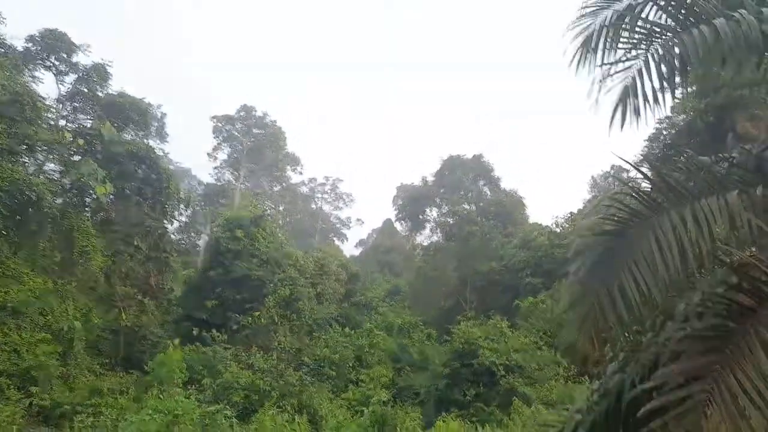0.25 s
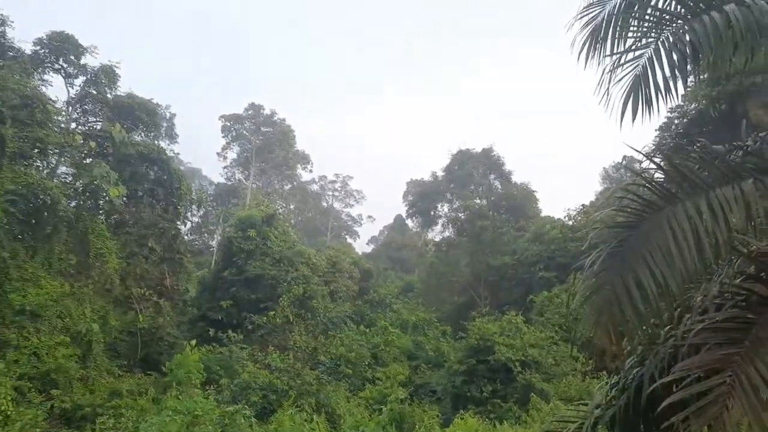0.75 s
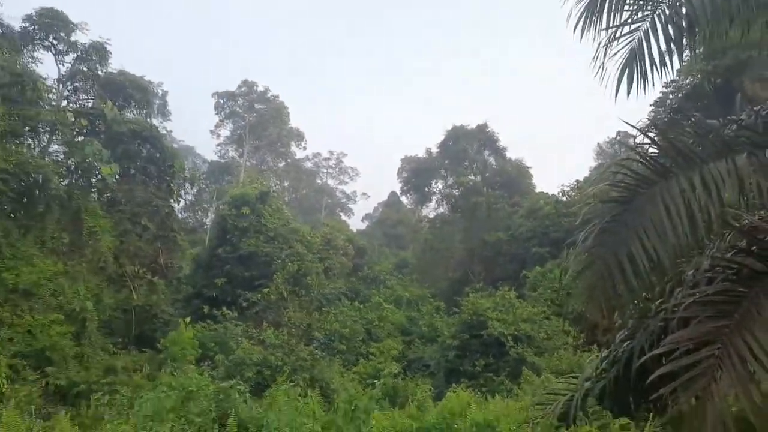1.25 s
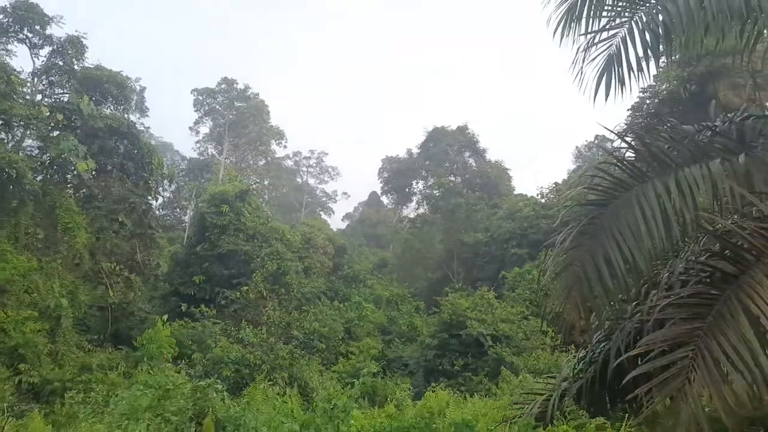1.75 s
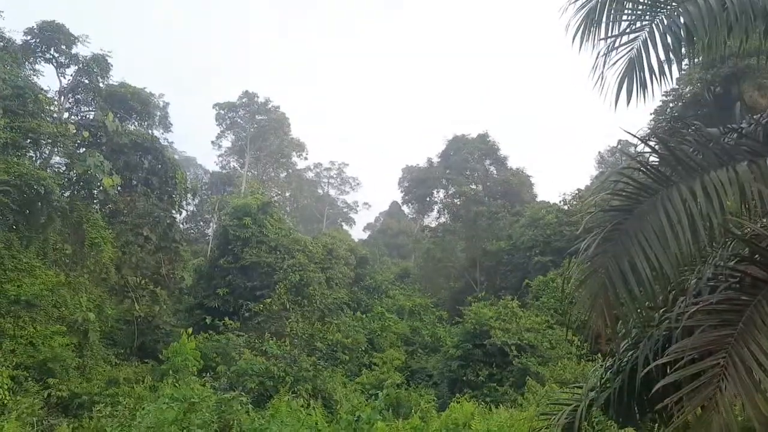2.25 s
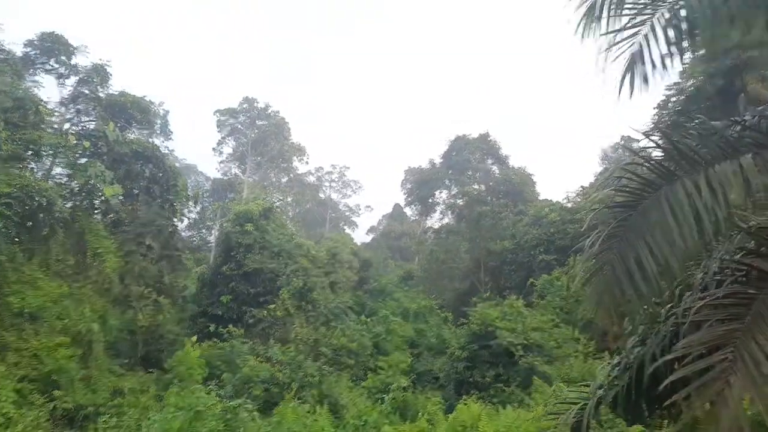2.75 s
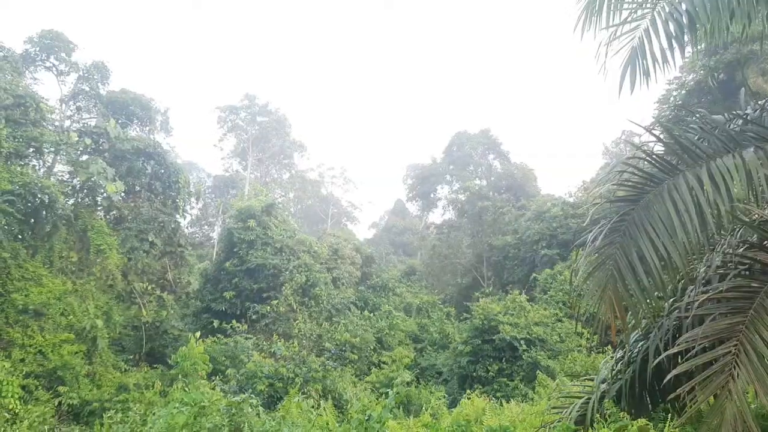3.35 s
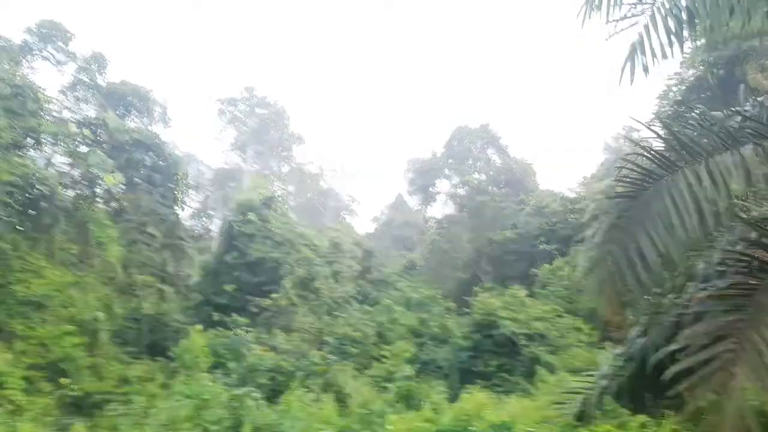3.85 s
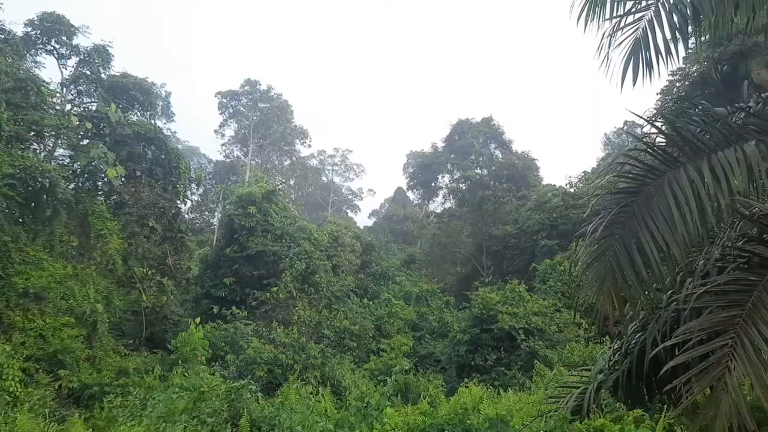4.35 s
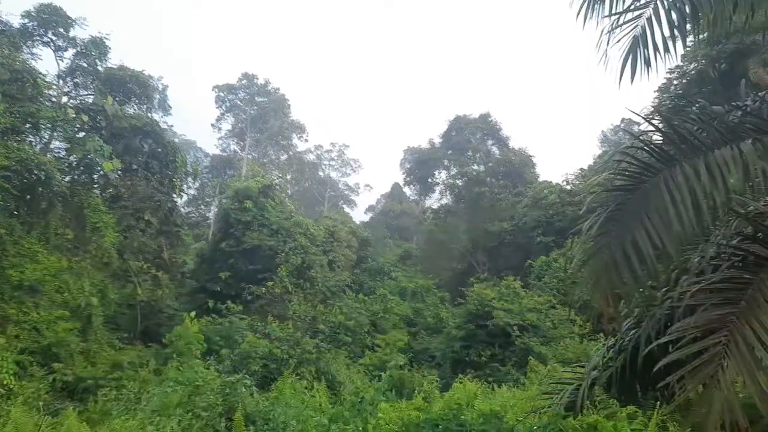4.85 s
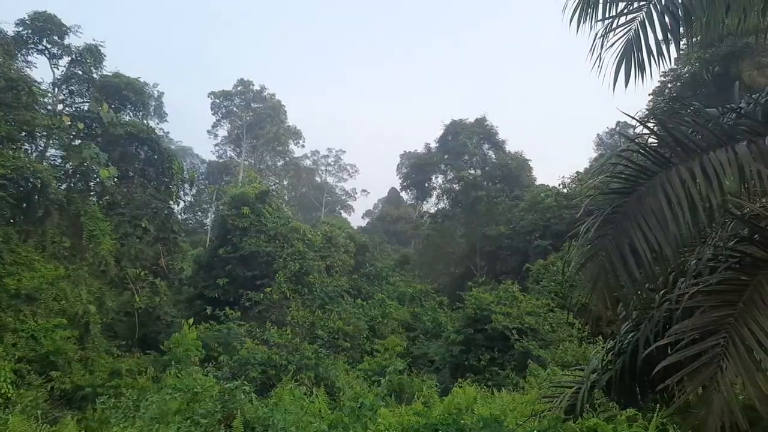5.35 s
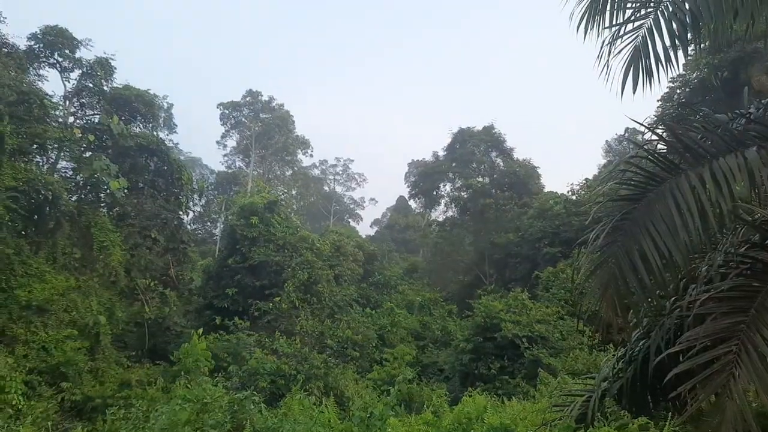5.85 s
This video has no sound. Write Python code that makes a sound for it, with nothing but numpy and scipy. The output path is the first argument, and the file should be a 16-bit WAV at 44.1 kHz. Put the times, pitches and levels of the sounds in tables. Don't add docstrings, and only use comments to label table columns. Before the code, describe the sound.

A near gibbon's whistled note climbs and holds, fingers tap the recorder, then lower gibbon hoots ring out amid cicadas and small birds.

```python
import sys
import numpy as np
from scipy import signal
from scipy.io import wavfile
from scipy.ndimage import uniform_filter1d

SR = 44100
rng = np.random.default_rng(int(sys.argv[2]) if len(sys.argv) > 2 else 0)


def level_to_linear(level):
    exponent = np.asarray(level, float) / 20
    return 10 ** exponent


def unload_audio(sound):
    columns = np.transpose(np.atleast_2d(sound))
    steps = np.round(np.clip(columns, -1, 1) * 32767)
    wavfile.write(sys.argv[1], SR, steps.astype(np.int16))


N = 269010
T = np.arange(N) / SR


def evened(x):
    return x / np.sqrt(np.mean(x ** 2) + 1e-20)


def curves(rows, t=T):
    s, *columns = np.transpose(rows)
    return [np.interp(t, s, column) for column in columns]


def sides(db):
    half = np.atleast_1d(db) / 2
    return level_to_linear(np.array([half, -half])) / np.cosh(db * np.log(10) / 40)


def add(mix, s, sound):
    part = mix[..., round(s * SR):][..., :sound.shape[-1]]
    part += sound[..., :part.shape[-1]]


def tone(turns):
    return np.sqrt(2) * np.sin(2 * np.pi * turns)


def slow(hz):
    lowpass = signal.butter(3, hz, fs=SR, output="sos")
    drift = signal.sosfilt(lowpass, rng.standard_normal(N + SR))[SR:]
    return np.clip(evened(drift), -2, 2)


def resonate(x, hz, width):
    r = np.exp(-np.pi * width / SR)
    pole = [1, -2 * r * np.cos(2 * np.pi * hz / SR), r * r]
    return evened(signal.lfilter([1, 0, -1], np.convolve(pole, pole), x))


# freq_hz, likeness_0_to_1
PORT_LIKENESS = [(25, 0.94), (70, .85), (110, 0.33), (170, 0.25), (300, 0.12), (500, 1), (900, 0.19),
                 (15000, 0.06)]


def noise(spectrum, patchy_db):
    hz = np.fft.rfftfreq(2048, 1 / SR)
    a, b, c, d, patches = rng.standard_normal((N // 512 + 5, 1025, 5)).T
    patches = uniform_filter1d(patches, size=16, axis=0)
    patches = evened(uniform_filter1d(patches, size=8, axis=1))

    def on_log_pitch(rows):
        freq_hz, value = np.transpose(rows)
        return np.interp(np.log(hz + 1), np.log(freq_hz + 1), value)[:, None]

    same = np.clip(on_log_pitch(PORT_LIKENESS), 0, 1)
    left = a + 1j * b
    right = same * left + np.sqrt(1 - same ** 2) * (c + 1j * d)
    z = np.array([left, right]) * level_to_linear(on_log_pitch(spectrum) + patchy_db * patches)
    return evened(signal.istft(z, nperseg=2048, noverlap=1536)[1][:, :N])


# freq_hz, level_db per Hz
AIR_SPECTRUM = [(24, -42), (40, -2.5), (92, -5.5), (189, -20.5), (309, -17.5), (410, -20), (593, -21),
                (1330, -28.5), (1560, -23.5), (1930, -33), (2470, -29.5), (2700, -59), (3510, -99.5),
                (5940, -120)]
# time_s, level_db
BREEZE_LEVEL = [(0, -2), (.6, -3), (1.0, -3.5), (1.8, -6), (2.3, -2.5), (3.2, 2), (3.8, -4.5), (4.9, -5),
                (5.7, -4.5), (6.1, -7)]


def air():
    breeze_db, = curves(BREEZE_LEVEL)
    return level_to_linear(-57 + breeze_db) * noise(AIR_SPECTRUM, patchy_db=3.5)


# time_s, firing_hz, level_db
ENGINE_LINE = [(0, 69.04, -57.5), (.2, 70.24, -51), (.8, 72.64, -53), (1.15, 75.45, -47),
               (1.6, 74.73, -44.5), (1.95, 76.45, -49), (2.15, 80.64, -60), (2.35, 79.36, -76),
               (2.6, 80.23, -50), (3.05, 78.36, -62), (3.45, 80.2, -69), (4.2, 75.05, -61),
               (4.6, 79.9, -50.5), (5.2, 81.8, -55.5), (5.35, 81.4, -90), (5.6, 78.4, -69),
               (5.75, 84.2, -59.5), (6.1, 84.6, -58.5)]
# time_s, lift_db
RUMBLE_GUSTS = [(.2, 12), (3.098, 13.4), (4.63, 4.3), (5.3, 6.7), (6.1, 8.4)]


def engine():
    hz, line_db = curves(ENGINE_LINE)
    bump_s = 0.23
    bumps_db = sum(db * np.exp(-((T - s) / bump_s) ** 2) for s, db in RUMBLE_GUSTS)
    rumble_db = line_db - 8.5 + bumps_db
    line = level_to_linear(line_db + 2.7 * slow(13)) * tone(np.cumsum(hz + 1.2 * slow(6.8)) / SR)
    rumble = level_to_linear(rumble_db + 1.6 * slow(8)) * resonate(rng.standard_normal(N), 116, 60)
    return (line + rumble) * sides(1.0)


def buzz(modes, clicks_hz, sharp):
    turns = np.cumsum(clicks_hz * (1 + 0.033 * slow(8))) / SR
    grit = rng.standard_normal((2, N)) + 0.54 * rng.standard_normal(N)
    puffs = np.exp(-sharp * (turns % 1)) * grit
    return evened(sum(level_to_linear(db) * resonate(puffs, hz, width) for hz, width, db in modes))


# freq_hz, level_db per Hz
CHORUS_SPECTRUM = [(2600, -53.5), (3300, -32), (3900, -30), (4400, -20.5), (4800, -15.5), (5550, -7.5),
                   (6600, -12), (7250, -25.5), (8600, -15.5), (10000, -29.5), (11700, -32.5),
                   (13500, -39.5), (15600, -40)]
# time_s, level_db
CHORUS_LEVEL = [(0, -43.5), (1.5, -43.5), (2, -46), (3.4, -44), (3.75, -46), (5, -45), (6.1, -46)]
# freq_hz, width_hz, level_db
DRONE_MODES = [(5580, 200, -6.5), (6000, 130, -9), (6467, 220, -7)]
# time_s, level_db
AHEAD_LEVEL = [(0, -73), (.75, -83.5), (1.15, -70), (1.95, -76), (3, -71.5), (4, -74), (6.1, -75)]
# time_s, throb_depth_0_to_1
LEFT_DEPTH = [(0, .2), (2.5, .88), (3.6, .88), (4.5, .15), (6.1, .2)]
EARLY_STOP_S = 1.93


def cicadas():
    level_db, = curves(CHORUS_LEVEL)
    chorus = level_to_linear(level_db - 4.5) * noise(CHORUS_SPECTRUM, patchy_db=2.6) * sides(4.3)
    drone = level_to_linear(level_db - 5.5) * buzz(DRONE_MODES, 190, sharp=3.7) * sides(1.3)

    ahead_db, = curves(AHEAD_LEVEL)
    throb = np.clip(.5 + 1.8 * np.cos(2 * np.pi * (6.1 * T - 0.21)), 0, 1)
    ahead_modes = [(5600, 600, 16), (6500, 400, 9), (10500, 900, 2), (11650, 600, 3.5)]
    ahead = throb * level_to_linear(ahead_db + 22) * buzz(ahead_modes, 86, sharp=3)

    depth, = curves(LEFT_DEPTH)
    swell = 1 + np.clip(depth, 0, 1) * np.cos(2 * np.pi * (6.385 * T - .65))
    left_modes = [(8420, 550, 0), (7900, 300, -9), (9200, 500, -9)]
    left = swell * level_to_linear(-59) * buzz(left_modes, 115, sharp=2.4) * sides(14.)
    left = left * (1 - 0.61 * (T < EARLY_STOP_S))

    singing = np.clip((EARLY_STOP_S - T) / .05, 0, 1)
    singing = singing * np.clip(.7 + np.cos(2 * np.pi * (6.6 * T - .2)), 0, 1)
    third = singing * level_to_linear(-61.0) * buzz([(9260, 560, 0)], 190, sharp=0.52) * sides(7.9)
    return chorus + drone + ahead + left + third


# time_into_phrase_s, level_db
CRICKET_PHRASE = [(0, -62), (.2, -63), (.33, -57), (.62, -60.5), (.98, -61), (1.1, -58), (1.27, -61)]
# middle_s, half_length_s
WING_RESTS = [(.75, .16), (2.0, .07), (2.31, .035), (2.9, .012), (3.05, .015), (3.135, .01), (3.33, .02),
              (3.63, .045), (4.29, .015), (4.6, .02), (4.75, .015), (4.85, .015), (5.475, .02), (5.82, .05),
              (5.98, .015)]


def cricket():
    into = (T - .79) % 1.27
    hz = 3136 - 83 * into
    level_db, = curves(CRICKET_PHRASE, into)
    wings = np.clip((T - .11) / 0.044, 0, 1) * (.6 + .4 * (T > .75))
    for s, half in WING_RESTS:
        wings = wings * (1 - .6 * np.exp(-((T - s) / half) ** 4))
    flutter_db = 2 * slow(9) + 1.8 * slow(45) - 1
    return wings * level_to_linear(level_db + flutter_db) * tone(np.cumsum(hz + 4 * slow(30)) / SR) * sides(-3.)


# start_s, level_db, centre_hz, width_hz, length_s
BRUSH_CRACKS = [(.258, -62, 1300, 900, .012), (.675, -61, 3500, 500, .09), (.78, -62, 3400, 700, .05),
                (1.39, -59, 680, 200, .05), (1.53, -60, 1200, 700, .025), (1.77, -64, 1150, 250, .04),
                (2.74, -70, 2100, 500, .04), (3.19, -73, 1600, 1000, .03), (4, -66, 1800, 250, .055),
                (4.25, -63, 900, 400, .035), (4.26, -66, 1500, 700, .04), (4.462, -58, 1250, 900, .025),
                (4.85, -69, 13500, 1500, .08), (5.275, -61, 1350, 500, .045), (5.28, -68, 2200, 400, .04),
                (5.44, -61, 12500, 6000, .09), (5.685, -61, 1000, 500, .04), (5.775, -61, 1100, 600, .025),
                (5.77, -72, 2650, 500, .17), (5.98, -68, 1400, 500, .04)]


def cracks():
    out = np.zeros((2, N))
    for s, db, hz, width, length in BRUSH_CRACKS:
        grains = rng.standard_normal((2, 8000))
        lumps = np.sqrt(rng.exponential(1, 80)).repeat(100)
        grains = (grains * lumps)[:, :round(length * SR)]
        add(out, s, level_to_linear(db) * resonate(grains, hz, width) * signal.windows.tukey(grains.shape[1], .6))
    return out


# crest_s, climb_s, slide_s, climb_db, slide_db
BIRD_SWOOPS = [(0.065, 0.039, 0.063, -99, -50), (0.336, 0.032, 0.075, -44, -60),
               (0.871, 0.0061, 0.057, -99, -47.5), (1.197, 0.036, 0.038, -46, -55),
               (1.787, 0.036, 0.067, -42.5, -45.5), (2.467, 0.049, 0.027, -41.5, -46),
               (4.496, 0.041, 0.046, -52.5, -45.5), (4.854, 0.01, 0.053, -99, -47),
               (5.303, 0.035, 0.025, -41, -45.5), (5.999, 0.036, 0.061, -53, -46.5)]
# start_s, length_s, middle_hz, level_db
CHIP_NOTES = [(1.785, 0.02, 4200, -50), (1.967, 0.011, 3910, -40.5), (3.362, 0.015, 3910, -43.5),
              (3.457, 0.021, 3910, -43.5), (4.235, 0.0091, 3920, -52), (4.325, 0.0083, 3940, -48.5),
              (4.446, 0.0082, 3640, -45.5), (4.462, 0.007, 3110, -45.5), (5.565, 0.0086, 3780, -58),
              (5.686, 0.012, 3940, -47.5), (5.703, 0.015, 3780, -46.5), (5.718, 0.03, 3540, -51.5)]
HOOK_NOTES = [(3.05, 0.092, 2730, -63.5), (3.675, .04, 2071, -72.5), (4.379, 0.017, 3950, -42),
              (4.529, 0.031, 3707, -42.5)]
ARCH_NOTES = [(3.438, 0.014, 4180, -59), (4.34, 0.017, 3830, -49)]
PEEP_NOTES = [(1.427, 0.078, 3820, -51), (2.065, .03, 4170, -47.5), (3.326, 0.017, 4560, -69),
              (3.535, 0.013, 3920, -51.5), (3.972, 0.11, 3890, -55.5), (4.388, .019, 3920, -60.5),
              (5.77, 0.024, 3520, -48.5)]
LEFT_PEEP_NOTES = [(.551, 0.063, 3895, -44), (3.72, 0.052, 2010, -69.5), (4.06, 0.028, 2303, -55),
                   (4.16, 0.022, 2308, -76), (4.292, 0.06, 2015, -65), (5.9, .03, 2020, -73)]
# start_s, length_s, from_hz, to_hz, level_db
GLIDE_CALLS = [(3.009, 0.42, 3890, 3500, -60.5), (2.395, 0.082, 3580, 3780, -59),
               (3.423, 0.084, 2134, 2400, -60), (3.428, .025, 3970, 4320, -44.5),
               (3.69, 0.026, 4300, 4700, -71), (3.737, 0.03, 1990, 1550, -68),
               (4.195, .035, 4530, 4350, -55.5), (0.627, 0.033, 4010, 4330, -48),
               (0.832, .04, 4760, 4870, -47.5), (4.653, 0.15, 5240, 4550, -51.5),
               (5.583, 0.086, 4180, 3845, -45), (5.745, 0.015, 3640, 4360, -43)]
# start_s, length_s, from_hz, to_hz, level_db
FLOCK_CALLS = [(2.094, .012, 4400, 3550, -53), (2.112, .023, 4850, 3250, -46),
               (2.138, .035, 3820, 3200, -52), (2.154, .02, 3600, 4060, -43),
               (2.178, .014, 3750, 3750, -48), (2.218, .018, 3570, 3720, -51),
               (2.24, .012, 3280, 3200, -50), (2.32, .016, 3100, 3300, -52), (3.477, .008, 3480, 3900, -47),
               (3.488, .014, 3950, 3000, -52), (3.52, .012, 3050, 3300, -48),
               (3.555, .016, 3560, 3200, -48), (.7, .02, 3300, 3900, -56), (.735, .02, 4000, 3400, -55),
               (.77, .025, 3700, 3200, -56), (.82, .02, 3300, 3800, -56)]
# start_s, length_s, from_hz, to_hz, level_db
STRAY_CALLS = [(1.72, .06, 2280, 2300, -64), (1.795, .02, 2330, 2350, -62), (1.83, .03, 2320, 2340, -64),
               (1.76, .03, 1950, 2050, -67), (1.933, .028, 4300, 4400, -47), (4.286, .008, 3200, 4300, -56),
               (4.295, .035, 4420, 4400, -55), (5.37, .016, 7500, 7950, -39),
               (5.388, .025, 7950, 7750, -37), (5.415, .028, 7700, 6700, -34.5),
               (4.83, .08, 6950, 6900, -55), (4.83, .06, 13900, 13800, -71), (3.61, .08, 3900, 3930, -61),
               (.873, .028, 2700, 3500, -54), (1.4, .014, 7600, 7400, -57), (2.3, .014, 7800, 7500, -58),
               (3.205, .014, 7850, 7600, -54), (4.16, .025, 7600, 7500, -57)]
# start_s, count
BIRD_TICKS = [
    (2.927, 3),
    (3.045, 1),
    (3.243, 3),
    (3.488, 3),
    (3.764, 3),
]


def birds():
    notes = []  # start_s, length_s, start_hz, middle_hz, end_hz, level_db, pan_db
    for s, count in BIRD_TICKS:
        for k in range(count):
            notes.append((s + k * .035, .017, 5150, 4700, 4300, -48 + k * 2.5, -3.))
    for crest, climb, slide, climb_db, slide_db in BIRD_SWOOPS:
        if climb:
            notes.append((crest - climb, climb, 4350, 4850, 5000, climb_db, 1.5))
        notes.append((crest, slide, 4950, 4220, 3330, slide_db, -1.))
    for s, length, a, b, db in GLIDE_CALLS + FLOCK_CALLS + STRAY_CALLS:
        notes.append((s, length, a, np.sqrt(a * b), b, db, 3.))
    shapes = [  # notes, start / middle pitch, end / middle pitch, pan_db
        (CHIP_NOTES, 1.14, 0.87, -8), (HOOK_NOTES, 0.79, 1.04, -1.5), (ARCH_NOTES, 0.79, 0.74, -8.5),
        (PEEP_NOTES, 1.01, 0.96, -1.), (LEFT_PEEP_NOTES, 0.99, 1.0, 7)]
    for rows, start, end, pan_db in shapes:
        notes += [(s, length, start * hz, hz, end * hz, db, pan_db) for s, length, hz, db in rows]

    out = np.zeros((2, N))
    for s, length, start, middle, end, db, pan_db in notes:
        u = np.linspace(-.1, 1.1, round(1.2 * length * SR))
        hz = start * (2 * u - 1) * (u - 1) + middle * 4 * u * (1 - u) + end * u * (2 * u - 1)
        note = level_to_linear(db) * tone(np.cumsum(hz) / SR) * signal.windows.tukey(len(u), .4)
        add(out, s - .1 * length, note * sides(pan_db))
    return out * level_to_linear(3 * slow(110) - 1.5)


# time_s, level_db
SKIN_LEVEL = [(0, -70), (.5, -67), (1.4, -64.5), (2.05, -75.5), (3.15, -82), (3.8, -83), (4.5, -67),
              (5.2, -76), (6.1, -67.5)]


def hand():
    level_db, = curves(SKIN_LEVEL)
    return level_to_linear(level_db + 3.0 * slow(20)) * resonate(rng.standard_normal(N), 200, 340) * sides(8.)


# start_s, level_db, case_ring_hz, crest_s, tick_db
FINGER_TAPS = [(0.257, -44.5, 393, 0.0033, -76), (0.646, -42, 264, 0.0042, -39),
               (0.757, -39.5, 225, 0.0045, -36), (1.055, -50, 287, 0.0031, -20),
               (1.089, -40.5, 270, 0.0036, -25), (1.2273, -27, 250, 0.0045, -30),
               (1.2277, -34, 650, 0.0012, -30), (1.279, -21.5, 500, 0.0022, -21),
               (1.2996, -19, 510, 0.0018, -40), (1.3001, -28, 1000, .0009, -40),
               (1.2796, -35, 950, .0009, -40), (1.304, -35.5, 250, 0.0097, -37),
               (1.314, -27, 358, 0.0012, -12)]
# start_s, level_db, width_s
NAIL_SNAPS = [
    (1.2277, -23, .00003),
    (1.2279, -32, .00007),
    (1.2797, -34, .00008),
    (1.3003, -16.5, .000033),
    (1.3003, -21, .00009),
]


def taps():
    out, t = np.zeros((2, N)), np.arange(4000) / SR
    for s, db, hz, crest, tick_db in FINGER_TAPS:
        ring = -np.sin(2 * np.pi * hz * t) * (t / crest * np.exp(1 - t / crest)) ** 1.73
        u = t / .00009
        tick = -level_to_linear(tick_db) * 2 * u * (1 - u / 2) * np.exp(1 - u)
        add(out, s, level_to_linear(db) * (ring + tick) * sides(53 + 0.2 * db))
    for s, db, width in NAIL_SNAPS:
        u = (t[:40] - t[20]) / width
        add(out, s - t[20], level_to_linear(db) * u * np.exp(-u ** 2 / 2) * sides(8.))
    return out


def voice(hz, level_db, side_db, partials, sounding=False):
    turns = np.cumsum(uniform_filter1d(hz, size=700)) / SR
    lines = level_to_linear(level_db) * tone(turns)
    for k, db in partials:
        mouth_db = 13 * np.exp(-((k * hz - 1600) / 110) ** 2)
        throat_db = -10.5 * np.exp(-((k * hz - 2963) / 97) ** 2)
        own_db = side_db if k % 1 else level_db
        lines = lines + level_to_linear(own_db + db + mouth_db + throat_db) * tone(k * turns)
    edge_s = .012
    fade = signal.windows.tukey(len(hz), 2 * edge_s * SR / len(hz))
    if sounding:
        fade[:len(hz) // 2] = 1
    return lines * fade * level_to_linear(0.51 * slow(30)[:len(hz)])


# time_s, pitch_hz, level_db
LOW_HOOTS = [
    [(2.113, 662.6, -36), (2.26, 664.5, -38), (2.43, 730.5, -29), (2.55, 780, -34), (2.64, 805.6, -34),
     (2.82, 794.3, -33.5), (3.25, 727.3, -30), (3.42, 704.4, -35), (3.595, 696, -30.5)],
    [(3.96, 508.7, -58.5), (4.06, 506.7, -53), (4.17, 523.2, -50), (4.47, 539.2, -46.5),
     (4.57, 550.5, -52.5), (4.66, 549.7, -47), (4.78, 554.7, -50), (4.85, 566, -35.5)],
    [(5.18, 449, -63), (5.29, 465, -58), (5.43, 483, -50), (5.6, 485.3, -50.5), (5.68, 503.5, -47.5),
     (5.845, 488, -52.5)],
]
# multiple_of_pitch, level_db
LOW_HOOT_PARTIALS = [
    [(.73, -41), (1.49, -46), (2, -49), (3, -62)],
    [(2, -45), (3, -41)],
    [(2, -45), (3, -42)],
]
HOOT_BENDS = [
    (.31, .25),
    (.174, .207),
    (.001, -.14),
]
# time_s, side_tone_db
FOLD_SLIPS = [(2.12, 0), (2.2, 9), (2.33, 1), (2.5, 2), (2.6, -9), (2.9, -9), (3.0, 3), (3.4, 3), (3.6, -3)]


def low_gibbons():
    out, bend_s = np.zeros((2, N)), .03
    for rows, (drop, flick), partials in zip(LOW_HOOTS, HOOT_BENDS, LOW_HOOT_PARTIALS):
        t = np.arange(rows[0][0], rows[-1][0], 1 / SR)
        hz, level_db = curves(rows, t)
        head, tail = np.exp((t[0] - t) / bend_s), np.exp((t - t[-1]) / bend_s)
        level_db = level_db - 27 * head - 21.5 * tail
        side_db = level_db + curves(FOLD_SLIPS, t)[0]
        bent_hz = hz * (1 + drop * head + flick * tail)
        add(out, t[0], voice(bent_hz, level_db, side_db, partials) * sides(1))
    return out


# time_s, pitch_hz, level_db, pan_db
HIGH_NOTES = [
    [(0, 1360, -32.5, 3), (.09, 1370, -36, -1.5), (.16, 1362, -35, -2), (.3, 1386, -35, 3.5),
     (.54, 1420, -40.5, -13.5), (.66, 1424, -45, -9), (.74, 1453, -48, -7), (.8, 1462, -36.5, 3),
     (.86, 1510, -51, 16.5)],
    [(.86, 1489, -32.5, -12), (.9, 1571, -47.5, 13), (1.03, 1585, -51.5, 38.5), (1.19, 1571, -40.5, 23),
     (1.27, 1574, -48, 35), (1.39, 1574, -37, 5), (1.47, 1590, -44, 24), (1.56, 1581, -40, 22),
     (1.61, 1524, -44.5, 8)],
]
# multiple_of_pitch, level_db under the line
HIGH_NOTE_PARTIALS = [
    [(2, -12.5), (3, -25)],
    [(2, -20.5), (3, -15.5)],
]


def high_gibbon():
    out = np.zeros((2, N))
    for rows, partials in zip(HIGH_NOTES, HIGH_NOTE_PARTIALS):
        t = np.arange(rows[0][0], rows[-1][0] + 0.012, 1 / SR)
        hz, level_db, pan_db = curves(rows, t)
        note = voice(hz, level_db, level_db, partials, sounding=t[0] == 0)
        add(out, t[0], note * sides(pan_db))
    return out


def forest(x, trunks_db, trunks_t60, valley_db, slope_db, send_db=0):
    t = np.arange(2 * SR) / SR
    paths = rng.standard_normal((2, 2 * SR)) / np.sqrt(2 * SR) * (t > .006)
    trunks = evened(level_to_linear(-60 * t / trunks_t60)) * level_to_linear(trunks_db)
    valley = evened(level_to_linear(-60 * t / 2.25)) * level_to_linear(valley_db)
    slope = evened(np.exp(-((t - 1.05) / 0.98) ** 2)) * level_to_linear(slope_db)
    sent = (level_to_linear(send_db) * x.mean(0))[None]
    return x + signal.fftconvolve(sent, paths * (trunks + valley + slope), axes=1)[:, :N]


def scene():
    high = forest(high_gibbon(), -11, .7, -14.0, -47.0)
    further_db = 5 * (T > 3.8)
    low = forest(low_gibbons(), -16.0, 0.44, -23.0, -37.5, further_db)
    brush = forest(level_to_linear(-1.5) * birds() + level_to_linear(3.5) * cracks(), -2, .4, -26, -50)
    insects = cricket() + cicadas()
    return high + low + brush + insects + engine() + hand() + air() + taps()


def gate(x):
    hz, _, z = signal.stft(x, SR, nperseg=1024, noverlap=768)
    power = uniform_filter1d((abs(z) ** 2).mean(0), size=6, axis=1)

    def spread_db(size):
        return 10 * np.log10(abs(uniform_filter1d(power, size=size, axis=0)) + 1e-20)

    near_db, wide_db = spread_db(5), spread_db(61)
    usual_floor_db = np.percentile(near_db, 30, axis=1, keepdims=True)
    floor_db = np.maximum(usual_floor_db, wide_db - 31)
    band = ((hz > 400) & (hz < 4300))[:, None]
    shut = np.clip((floor_db - near_db) / 3, 0, 1) * band
    return signal.istft(z * level_to_linear(-15 * shut), SR, nperseg=1024, noverlap=768)[1][:, :N]


def low_pass(x):
    return signal.sosfilt(signal.butter(12, 15780, fs=SR, output="sos"), x)


def record(dry):
    ports = np.array([np.roll(dry[0], 3), dry[1]])
    bass_cut = signal.butter(4, 38, "high", fs=SR, output="sos")
    mix = gate(signal.sosfilt(bass_cut, ports))
    return low_pass(mix)


dry = scene()
out = record(dry)
unload_audio(out)
```